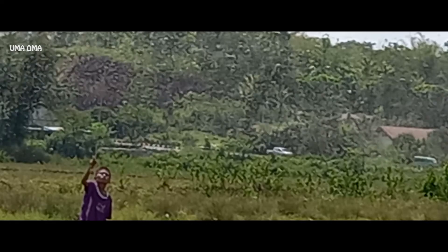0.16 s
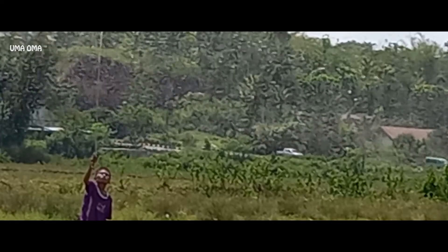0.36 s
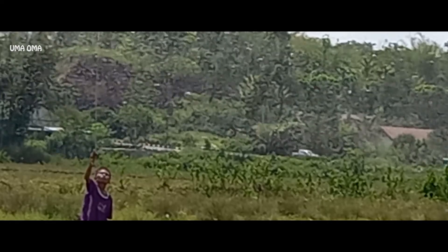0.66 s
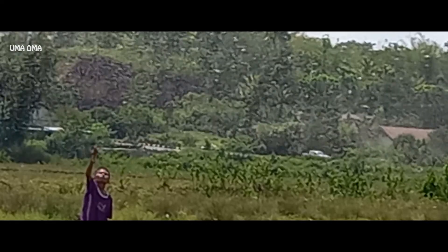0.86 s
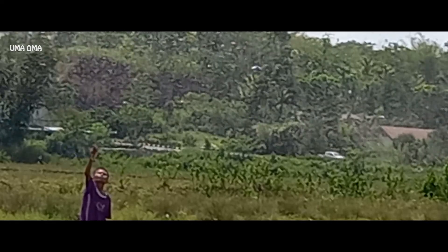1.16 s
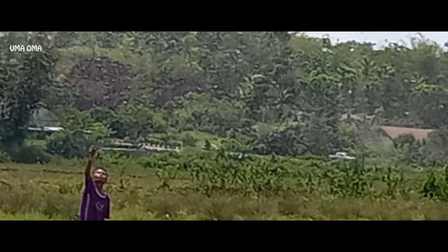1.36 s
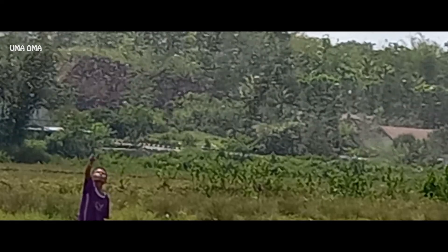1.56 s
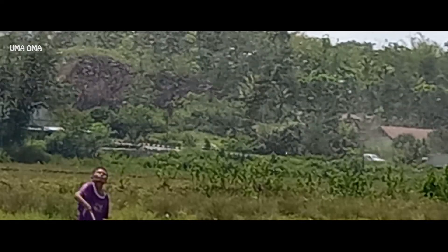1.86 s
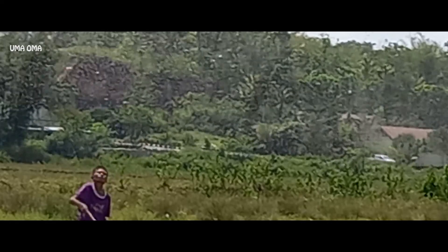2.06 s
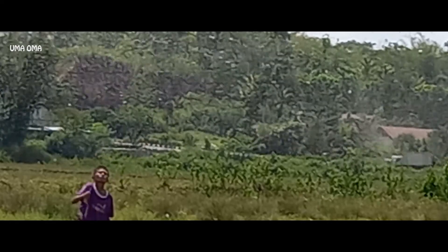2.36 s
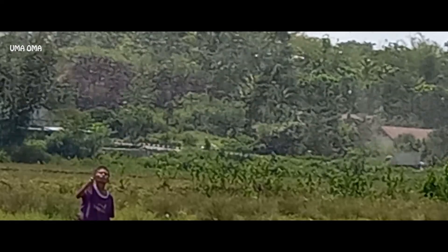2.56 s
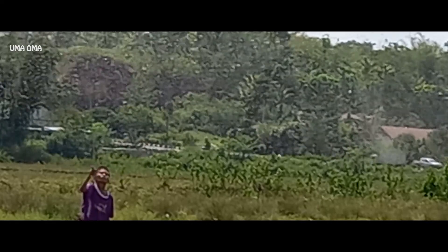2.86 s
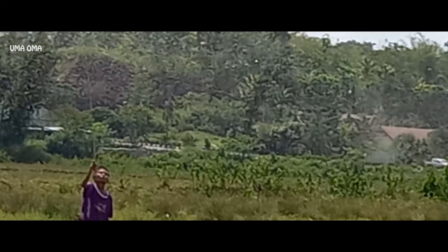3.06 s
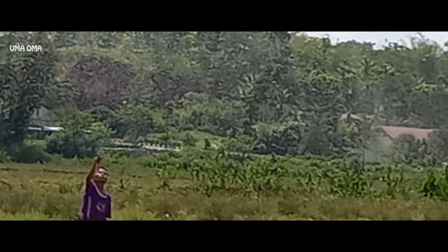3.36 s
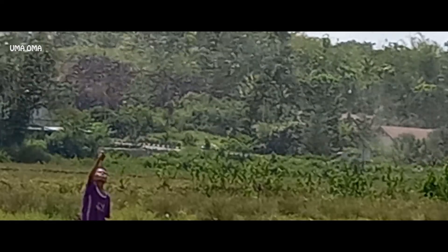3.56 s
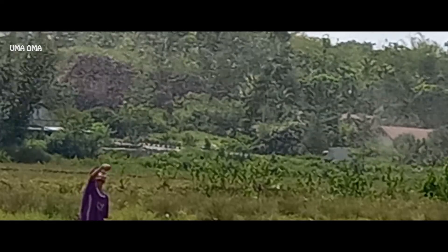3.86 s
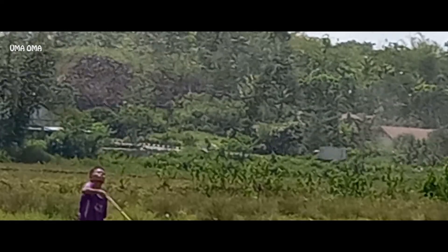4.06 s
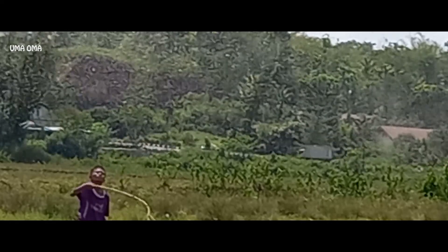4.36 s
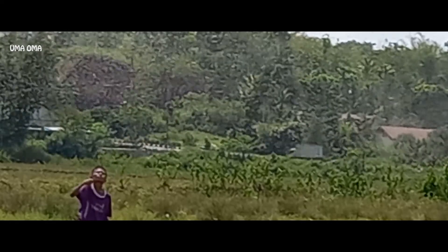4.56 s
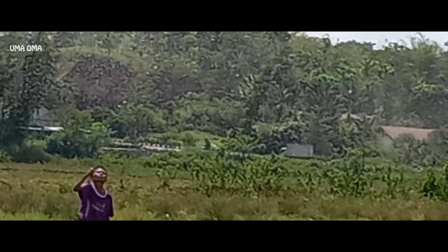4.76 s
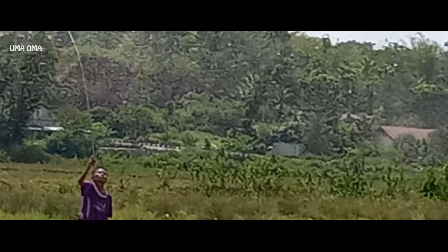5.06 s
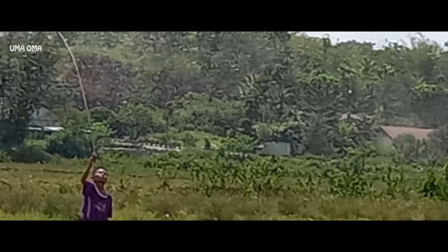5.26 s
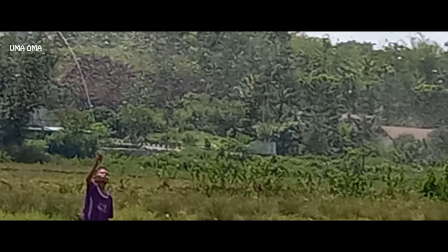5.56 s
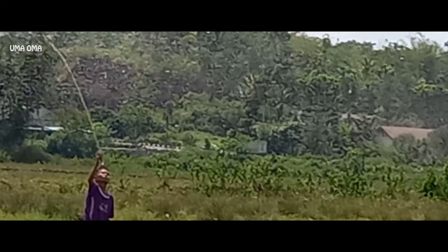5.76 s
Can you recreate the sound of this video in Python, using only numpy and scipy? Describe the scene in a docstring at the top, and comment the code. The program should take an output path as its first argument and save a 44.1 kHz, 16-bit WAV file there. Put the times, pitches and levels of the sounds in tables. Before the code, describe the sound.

A distant single-cylinder engine thuds low throughout in an open field, with a fainter motorbike drone, very faint high insect song and a light wind rumble on the microphone. During the first 1.3 seconds, birds give soft chirps and whistles, leaves stir faintly and a few low wind puffs land. At about 1.3 seconds a horse, somewhat to the right, whinnies once, much louder than everything else. Its high rising squeal breaks at 1.8 seconds into a fast quaver of about eight shakes a second, sinking and growing rougher and hoarser. It ends at 3.5 seconds with a faint hillside echo. Beneath it, the engine speeds up slightly around 2 seconds and settles by 3.5. From 4.8 seconds an insect makes a run of quiet dry ticks that grow stronger, and wind puffs touch the microphone around 5.3 and 5.8 seconds.

```python
"""A far single-cylinder engine thuds and rattles in an open field, with bird calls and microphone wind. Then a
horse whinnies once: a high squeal that breaks into a falling, ever rougher quaver. Its larynx sings two notes
at once (biphonation): a whistle, and a lower buzz that slows to separate slaps in the troughs. The throat's
resonances shape both, and a wooded hillside answers faintly. Insects sing throughout, and a run of dry clicks
ticks near the end."""
import sys
import numpy as np
from scipy import signal
from scipy.fft import rfft, irfft, next_fast_len
from scipy.io import wavfile
from scipy.ndimage import uniform_filter1d, map_coordinates

SR = 44100
rng = np.random.default_rng(int(sys.argv[2]) if len(sys.argv) > 2 else 0)


def to_wav(sig):
    """Store sig (one row per channel, or 1-D mono) as 16-bit WAV at the path in sys.argv[1].

    Samples outside -1..1 are clipped; the rate is SR.
    """
    pcm = np.clip(np.atleast_2d(sig), -1, 1) * 32767
    pcm = np.round(pcm).astype(np.int16)
    wavfile.write(sys.argv[1], SR, pcm.T)  # frames by channels


N = 261072
TIME = np.arange(N) / SR
TOP_HZ = 15750

# Spectra of air, leaves and dry clicks. Each row: frequency in Hz, relative level in dB.
AIR_SPECTRUM = [(290, -10), (500, 1), (537, -9), (667, -0.5), (1100, -7.5), (2140, -19), (5450, -22.5),
                (6290, -31.5), (8510, -23), (15600, -31.5)]
LEAF_SPECTRUM = [(1200, -28), (1700, 3.5), (2300, 5), (3000, -2), (4200, -13.5), (7000, -16), (11000, -24)]
CLICK_SPECTRUM = [(2000, -22.5), (5000, -13.0), (9000, 1.0), (14000, 0.5)]
# Envelopes of the leaves and of the fizz between clicks. Each row: time in seconds, level in dB.
LEAF_LEVEL = [(0, -73), (.3, -67.5), (.7, -71.5), (1.2, -71.5), (3.5, -78.5), (5.92, -78.5)]
FIZZ_LEVEL = [(3.5, -105), (4.8, -92), (5.8, -89)]
# Wind puffs. Each row: centre in seconds, level in dB, half length in seconds, left minus right in dB.
WIND_PUFFS = [(0.347, -50.5, 0.031, 5), (0.612, -46, 0.022, 5), (0.703, -44.5, 0.02, 22.5),
              (5.303, -47, 0.029, -2), (5.845, -41, 0.026, -5)]
# A run of dry clicks. Each row: time in seconds, relative peak in dB.
DRY_CLICKS = [(4.8218, -70.5), (4.8616, -70.5), (5.024, -67.5), (5.0656, -72), (5.1053, -63.5),
              (5.1862, -75.5), (5.2259, -68.5), (5.3437, -65.5), (5.3824, -68), (5.4229, -71),
              (5.5044, -64), (5.545, -69), (5.5856, -74), (5.6265, -61.5), (5.667, -64), (5.7095, -55),
              (5.7497, -56), (5.792, -54), (5.8326, -59.5), (5.874, -53)]
# Bird calls. Each row: start and length in seconds, first, middle and last pitch in Hz,
# waver as a share of the pitch, level in dB.
BIRD_CALLS = [(0.05, 0.14, 8130, 8080, 8300, .004, -73), (0.17, .11, 8300, 7900, 7500, .012, -73),
              (0.11, .21, 2190, 2190, 2260, .02, -71), (0.41, .13, 5900, 7800, 7900, 0.051, -71.5),
              (0.43, .09, 2900, 3150, 2970, .06, -69.5), (0.6, .14, 2260, 2260, 2190, 0.025, -70),
              (0.772, 0.16, 7670, 7850, 8500, .02, -71.5), (0.91, .19, 1112, 1107, 1098, 0.017, -59),
              (1.05, 0.23, 1090, 1042, 1006, .07, -68), (4.253, 0.018, 3100, 3490, 4400, 0.044, -73.5),
              (4.9, .1, 5450, 5546, 5450, .04, -87), (5.36, .1, 5100, 4980, 4860, 0.036, -87)]

# Speeds of the engine's rattle and of its firings. Each row: time in seconds, pulses per second.
RATTLE_SPEED = [(0, 37.5), (.45, 37.45), (1, 37.3), (1.4, 37.4), (4, 38), (5.92, 38)]
ENGINE_SPEED = [(0.0, 18.4), (0.8, 18.06), (1.5, 19.04), (1.9, 21.27), (2.3, 22.97), (2.7, 22.76),
                (3.1, 20.27), (3.6, 18.93), (4.6, 19.3), (5.92, 18.89)]
# Spectra of the engine's rattle, drone, thuds and exhaust. Each row: frequency in Hz, relative level in dB.
RATTLE_SPECTRUM = [(300, -17.5), (450, -17), (700, 2.5), (900, 1), (1150, -23.5), (1600, -52.5)]
DRONE_SPECTRUM = [(110, -24.5), (185, 1.5), (225, 1.5), (290, -10.5), (375, -4), (480, -14.5), (600, -29.5),
                  (900, -49.5)]
THUD_SPECTRUM = [(20, -45.5), (35, -17.5), (55, -4), (85, -1), (120, 6.5), (160, -4.5), (220, -32.5),
                 (320, -40.5), (600, -76)]
EXHAUST_SPECTRUM = [(20, -36), (55, 1.5), (130, 4), (220, -6.5), (310, -11), (450, -28), (800, -46),
                    (1500, -45.5), (3000, -100)]
# The envelopes of the engine's rattle. Each row: time in seconds, rattle in dB, drone in dB.
RATTLE_LEVELS = [(0, -65, -61.5), (.3, -60.5, -68), (.6, -66, -65.5), (1.2, -68.5, -62.5), (2, -79.5, -63),
                 (5.92, -84, -68.5)]
# The engine's envelope. Each row: time in seconds, level in dB.
ENGINE_LEVEL = [(0, -60.5), (.4, -49.5), (.9, -53), (1.9, -46), (2.2, -49), (2.6, -45.5), (3.45, -47),
                (3.75, -50.5), (4.9, -46.5), (5.92, -47.5)]
# The exhaust hardens as the engine is opened up. Each row: time in seconds, dB over the thuds.
EXHAUST_BALANCE = [(0, -4), (1.3, -7), (2, 0.5), (5.92, -1)]

# Shading of a source on the right. Each row: frequency in Hz, left minus right in dB.
SIDE_SHADING = [(1300, 0), (2400, -1.5), (4400, -3.5), (8100, -8), (15000, -1)]
# The hillside's reverberation. Each row: frequency in Hz, seconds to fall by 60 dB.
HILLSIDE_T60 = [(300, 3.6), (2000, 1.1), (4500, 0.98), (8000, 0.54), (15000, 0.2697)]
# Responses of the hillside and of the horse's throat and nose. Each row: frequency in Hz, gain in dB.
HILLSIDE_GAIN = [(1100, -1.5), (1600, -6), (1850, -1), (2020, 4.5), (2250, -2.5), (2800, -2.5),
                 (4100, -1.5), (5000, 1.5), (9000, -3.5)]
VOCAL_TRACT = [(300, -26.5), (700, -26.5), (950, -15.5), (1170, -29.5), (1450, -12), (1900, 2), (2350, -3),
               (2780, 1.5), (3060, -2), (3260, -5), (3370, -16.5), (3520, 2.5), (3700, -14), (3950, -13.5),
               (4250, -7.5), (4700, -18), (4980, -6), (5350, -8), (5750, -15), (6250, -27), (6620, -30.5),
               (6950, -38.5), (7550, -19.5), (7780, -32), (8020, -17), (8300, -28.5), (8850, -27.5),
               (9300, -32.5), (10500, -32), (11600, -28), (12800, -27.5), (14000, -33), (15500, -45)]

# The opening squeal. Each row: time in seconds, pitch in Hz, roughness 0-1, whistle in dB, octave in dB.
SQUEAL = [(1.33, 1550, 0.17, -50.5, -60), (1.365, 1903, 0.04, -43.5, -54.5), (1.39, 2070, 0.05, -39.5, -46),
          (1.408, 2220, 0.05, -48.5, -48), (1.435, 2256, 0.29, -44, -63.5), (1.48, 2264, 0.16, -44, -45),
          (1.51, 2340, 0.11, -36.5, -45.5), (1.59, 2340, .13, -34.5, -40), (1.645, 2335, 0.17, -32, -38.5),
          (1.70, 2287, 0.32, -36, -42), (1.755, 2221, 0.3, -37.5, -42.5)]
# The quaver's arches of pitch. Each row: start in seconds, crest in Hz, depth in Hz, base level in dB,
# roughness added by the break 0-1, share of the shake after which the pressure gives out.
SHAKES = [(1.755, 2381, 102, -34.5, 0.16, 1), (1.861, 2384, 140, -33, 0.08, 0.97),
          (1.981, 2347, 240.3, -33.5, 0.27, 1), (2.103, 2327, 318.4, -31, 0.25, 1),
          (2.222, 2325, 339.8, -30.5, 0.22, 1), (2.345, 2312, 439.2, -30.5, 0.35, 0.89),
          (2.471, 2286, 521, -30, 0.27, 0.9), (2.599, 2258, 601, -30.5, 0.24, 0.81),
          (2.73, 2136, 640, -29.5, 0.17, 0.77), (2.855, 2090, 702, -30.5, .16, .7),
          (2.982, 1982, 560, -29.5, .08, .62), (3.112, 2140, 618.8, -30, 0.13, .76),
          (3.234, 2197, 598, -31.5, 0.18, 0.86), (3.362, 2136, 659.4, -31.5, 0.11, .76)]
# The octave comes forward in the quaver. Each row: time in seconds, dB over the shake's base level.
OCTAVE_BALANCE = [(1.83, -9.5), (1.92, -7.5), (2.08, -7.5), (2.17, -3), (2.55, -2), (2.75, -4),
                  (3.48, -2.5)]
# The voice's treble. Each row: time in seconds, base levels of rasp and sizzle in dB.
TREBLE_LEVELS = [(1.34, -65.5, -79.5), (1.375, -64, -60), (1.405, -62.5, -63.5), (1.49, -56, -45.5),
                 (1.61, -45.5, -41.5), (1.71, -48, -55.5), (1.88, -61, -68), (2.03, -54, -58),
                 (2.15, -50, -68.5), (2.3, -42.5, -52), (2.4, -44, -51), (2.55, -44.5, -57.5),
                 (2.8, -41, -48), (2.98, -46, -54), (3.18, -40.5, -55), (3.33, -42.5, -61),
                 (3.48, -43.5, -57.5)]
# The tiring folds open strongly and weakly by turns. Each row: time in seconds, hoarseness 0-1.
HOARSENESS = [(1.9, 0), (2.25, .35), (2.65, .5), (2.8, .9), (3.48, 1)]
# Squeaks beside the octave. Each row: centre and half length in seconds, pitch in Hz, level in dB.
SQUEAKS = [(1.755, 0.028, 4440, -36), (2.195, .016, 4950, -35.5), (2.312, 0.038, 4960, -33),
           (2.437, 0.015, 4930, -35), (2.556, .014, 4880, -33), (3.298, 0.019, 4870, -37)]
VOICE_END_S = 3.485  # the last shake ends


def amp(db):
    """Amplitude ratio of a level in decibels."""
    return 10 ** (np.asarray(db) / 20)


def unit(x):
    """Normalisation to an overall rms of 1."""
    return x / np.sqrt(np.mean(np.abs(x) ** 2) + 1e-20)


def steady(x, size=900):
    """Normalisation to a running rms of 1, over size samples."""
    return x / np.sqrt(np.abs(uniform_filter1d(np.abs(x) ** 2, size)) + 1e-12)


def along(points, hz):
    """Interpolation of (Hz, value) points on a logarithmic axis."""
    f, v = np.transpose(points)
    return np.interp(np.log(hz + 1), np.log(f + 1), v)


def curves(rows):
    """Linear interpolation, per sample, of each column after the time."""
    s, *columns = np.transpose(rows)
    return [np.interp(TIME, s, c) for c in columns]


def wobble(rate):
    """Smooth random modulation with rate knots a second."""
    return map_coordinates(rng.standard_normal(int(N * rate / SR) + 4), [TIME * rate])


def bell(centre_s, half_s):
    """A Gaussian envelope."""
    return np.exp(-((TIME - centre_s) / half_s) ** 2 / 2)


def pulses(cycles):
    """An impulse train: one pulse per completed cycle."""
    return np.diff(np.floor(cycles), prepend=0)


def noise(side):
    """Partly coherent stereo white noise; side weights the part that differs between the ears."""
    a, b = rng.standard_normal((2, N))
    return unit(np.array([a + side * b, a - side * b]))


def band(hz, low_hz, high_hz, order=16):
    """Gain of a steep band-pass filter."""
    return 1 / (1 + (low_hz / (hz + 1)) ** order) / (1 + (hz / high_hz) ** order)


def filtered(x, response):
    """Linear filtering: the spectrum of x times a complex response."""
    m = next_fast_len(N + SR // 2)
    return irfft(rfft(x, m) * response(np.fft.rfftfreq(m, 1 / SR)), m)[..., :N]


def coloured(x, spectrum):
    """Spectral shaping by (Hz, dB) points, at rms 1."""
    return unit(filtered(x, lambda hz: amp(along(spectrum, hz))))


def struck(x, spectrum):
    """Minimum-phase ringing through a (Hz, dB) spectrum: nothing sounds ahead of a pulse."""
    size = 4096
    cepstrum = irfft(np.log(amp(along(spectrum, np.fft.rfftfreq(size, 1 / SR)))))
    ring = irfft(np.exp(rfft(cepstrum * 2 * (np.arange(size) < size // 2))))
    return signal.fftconvolve(x, ring)[:N]


def reverberate(x, tail):
    """Convolution with a stereo impulse response, normalised in energy."""
    return signal.fftconvolve(x[None], tail / np.linalg.norm(tail[0]), axes=1)[:, :N]


def field():
    """Ambient noise: broadband air and stirring leaves, and a narrow band of insect song."""
    air = amp(-73) * coloured(noise(side=1), AIR_SPECTRUM)
    leaf_db = curves(LEAF_LEVEL)[0] + .9 * wobble(17)
    leaves = amp(leaf_db) * coloured(noise(side=.93), LEAF_SPECTRUM)
    insects = unit(filtered(noise(side=.46), lambda hz: band(hz, 8060, 8520, order=50)))
    return air + leaves + amp(-83.5 + wobble(6.7)) * insects * amp([[-5], [3]])


def wind():
    """Turbulent pressure on the microphone: short low puffs over a weak buffeting."""
    puffs = sum(amp([[db + pan_db / 2], [db - pan_db / 2]]) * bell(s, half_s)
                for s, db, half_s, pan_db in WIND_PUFFS)
    eddies = filtered(noise(side=.33), lambda hz: band(hz, 50, 98, order=8))
    return steady(eddies, size=3000) * (puffs + amp(-54.5 + 2.7 * wobble(6.9)))


def dry_ticks(width_s=.0025, gain_db=-10.5):
    """Broadband transients: a run of dry clicks, with a faint fizz between them."""
    clicks = sum(amp(db + gain_db) * np.exp(-np.abs(TIME - s) / width_s) for s, db in DRY_CLICKS)
    return (clicks + amp(curves(FIZZ_LEVEL)[0])) * coloured(noise(side=.55), CLICK_SPECTRUM)


def birds():
    """Frequency modulation: each call is a gliding whistle, made buzzy by a fast waver."""
    song, waver = np.zeros(N), wobble(700)
    for s, length, start_hz, middle_hz, end_hz, unsteady, db in BIRD_CALLS:
        call = (TIME >= s) & (TIME < s + length)
        progress = (TIME[call] - s) / length
        hz = np.interp(progress, [0, .5, 1], [start_hz, middle_hz, end_hz])
        hz *= 1 + unsteady * waver[call]
        song[call] += amp(db) * np.sin(np.pi * progress) * np.sin(2 * np.pi * np.cumsum(hz) / SR)
    return song


def engine_rattle(pop_s=.024, pop_scatter=.35):
    """Repetition makes pitch: nearly identical pops, smeared by distance, merge into a drone."""
    firing_hz = curves(RATTLE_SPEED)[0] * (1 + .002 * wobble(5))
    cycle = np.cumsum(firing_hz) / SR
    decay = np.exp(-(cycle % 1) / firing_hz / pop_s)
    smear = rng.standard_normal(SR // 20) * np.exp(-np.arange(SR // 20) / SR / pop_s)
    pops = unit(signal.fftconvolve(pulses(cycle), smear)[:N])
    putter = pops + pop_scatter * unit(noise(side=.84) * decay)
    rattle_db, drone_db = curves(RATTLE_LEVELS)
    return amp(rattle_db) * coloured(putter, RATTLE_SPECTRUM) + amp(drone_db) * coloured(putter, DRONE_SPECTRUM)


def engine(scatter_db=.34):
    """Periodic excitation: each firing gives one low thud and one puff of exhaust noise."""
    cycle = np.cumsum(curves(ENGINE_SPEED)[0]) / SR
    firings = pulses(cycle) * amp(scatter_db * wobble(8.2))
    thuds = -coloured(firings, THUD_SPECTRUM)
    puffing = np.exp(.25 * np.cos(2 * np.pi * cycle))
    exhaust = amp(curves(EXHAUST_BALANCE)[0]) * coloured(noise(side=.42) * puffing, EXHAUST_SPECTRUM)
    return amp(curves(ENGINE_LEVEL)[0]) * unit(thuds + exhaust) * amp([[-1], [1]])


def hillside(x, build_s=.18):
    """Diffuse reflection: farther trees answer later, so the echo builds, then fades, treble first."""
    hz, t, spectra = signal.stft(rng.standard_normal((2, 3 * SR // 2)), SR, nperseg=256)
    build = 1 - np.exp(-t / build_s)
    decay = amp(-60 * t / along(HILLSIDE_T60, hz)[:, None])
    tail = signal.istft(spectra * build * decay, SR, nperseg=256)[1]
    return reverberate(filtered(x, lambda hz: amp(along(HILLSIDE_GAIN, hz))), tail)


def crops(x, t60_s=.055):
    """Scattering by crops near the horse: a short tail, nearly alike at both ears."""
    t = np.arange(SR // 10) / SR
    return reverberate(x, noise(side=.5)[:, :len(t)] * amp(-60 * t / t60_s))


def from_right(x, lag_ms=.4364):
    """Interaural time and level differences: the left side hears the sound later and shaded."""
    def ears(hz):
        left = amp(along(SIDE_SHADING, hz) / 2) * np.exp(-1j * np.pi * hz * lag_ms / 1000)
        pair = np.array([left, 1 / left])
        return pair / np.sqrt(np.mean(np.abs(pair) ** 2, axis=0))
    return filtered(x, ears)


def quaver(crest_at=.48, break_at=.58, swell_db=3.5, spent_db=4, clean_hz=2620, choke_hz=530):
    """Modulation of pitch and pressure: each shake swells, then breaks, sags and chokes."""
    start, *columns, gives_out = np.transpose(SHAKES)
    edges = np.append(start, VOICE_END_S)
    middles = (edges[:-1] + edges[1:]) / 2
    crest_hz, depth_hz, db, break_rough = [np.interp(TIME, middles, c) for c in columns]
    progress = np.interp(TIME, edges, np.arange(len(edges))) % 1
    # round crests, pointed troughs
    sag_hz = depth_hz * np.interp(progress, [0, crest_at, 1], [1, 0, 1]) ** 1.8
    broken = uniform_filter1d((progress > break_at) * 1.0, size=400)
    coming_sag_hz = np.interp(TIME + .006, TIME, sag_hz)  # roughness leads the trough
    rough = (clean_hz - crest_hz) / 1400 + break_rough * broken + coming_sag_hz / 780
    choke = (sag_hz / choke_hz) ** 2
    spent = sum((TIME > a + share * (b - a)) & (TIME < b)
                for a, b, share in zip(start, edges[1:], gives_out))
    pressure_db = uniform_filter1d(swell_db * (progress - .5) - spent_db * spent, size=400)
    # the voice catches for an instant between deep shakes
    catch = depth_hz / choke_hz * sum(np.exp(-((TIME - s) / .012) ** 2) for s in start[1:])
    whistle_db = db + pressure_db - 1.5 * choke - 1.5 * catch
    octave_db = db + curves(OCTAVE_BALANCE)[0] + pressure_db / 2 - 8.5 * choke
    return crest_hz - sag_hz, rough, whistle_db, octave_db


def larynx(pitch, rough, hoarse):
    """Biphonation: the slower vocal folds chop the flow and tug the whistle's phase, adding sidebands."""
    waver = .005 * wobble(45) + (.01 + .02 * rough ** 2) * wobble(700)
    phase = 2 * np.pi * np.cumsum(pitch * (1 + waver)) / SR
    fold_hz = 490 * (pitch / 2310) ** (1.15 - .3 * hoarse)
    jitter = (.11 - .03 * rough) * (1 - .55 * hoarse) * wobble(450)
    fold_phase = 2 * np.pi * np.cumsum(fold_hz * (1 + jitter)) / SR
    # strong and weak openings alternate; when rough they also scatter
    limp = hoarse * (1 - rough) * (.46 * np.exp(.5j * fold_phase) + .3 * np.exp(1.5j * fold_phase))
    creak = rough * (.4 * np.cos(fold_phase / 2) + .22 * wobble(350))
    opening = np.exp(rough ** .8 * np.cos(fold_phase) + creak + limp.real)
    tug = 1.35 * rough ** 1.1 * np.sin(fold_phase) + 1.05 * rough ** 2 * np.sin(fold_phase / 2)
    flow = steady(np.tanh(opening / 2))  # the folds can only open so far
    return phase, tug + limp.imag, fold_phase, flow


def flutter(pitch, flow, below_hz=2100, span_hz=600, range_db=10):
    """Flow-modulated noise: the throat flutters more as the pitch sinks."""
    slack = np.minimum((below_hz - pitch) / span_hz, 1)
    breath = filtered(flow * rng.standard_normal(N), lambda hz: band(hz, 523, 1030, order=10))
    return amp(-54 + range_db * (slack - 1)) * unit(breath)


def slaps(pitch, fold_phase, below_hz=2150, span_hz=350, scatter_db=1.1):
    """Period doubling: at low pitch the slack folds slap shut every second cycle and ring the throat."""
    closings = pulses(fold_phase / (4 * np.pi)) * amp(scatter_db * wobble(200))
    slack = np.clip((below_hz - pitch) / span_hz, 0, 1)
    return amp(-40) * slack * steady(struck(closings, VOCAL_TRACT), size=4000)


def squeaks(flow, jitter=.016):
    """Amplitude modulation: the folds chop brief, unsteady whistles that split off as the voice breaks."""
    phase_per_hz = 2 * np.pi * np.cumsum(1 + jitter * wobble(500)) / SR
    return sum(amp(db) * bell(s, half_s) * unit(flow * np.sin(hz * phase_per_hz))
               for s, half_s, hz, db in SQUEAKS)


def horse(attack_s=.02, blend_s=.046, release_db_per_s=557, crest_db_per_khz=8, crumble=.55):
    """Source and filter: whistle harmonics and turbulence, chopped by the folds, shaped by the throat."""
    shaking = np.clip((TIME - SHAKES[0][0]) / blend_s, 0, 1)
    controls = (1 - shaking) * np.array(curves(SQUEAL)) + shaking * np.array(quaver())
    pitch, rough, whistle_db, octave_db = controls
    rough = np.clip(rough, 0, 1)
    hoarse, = curves(HOARSENESS)
    phase, tug, fold_phase, flow = larynx(pitch, rough, hoarse)
    # in the deepest troughs the whistle gives way to turbulence
    whistle = flow * (1 - rough * np.interp(pitch, [1650, 2000], [.6, 0]))
    hiss = flow * (.16 + .55 * rough + .06 * rough ** 4)

    def register(orders, hiss_db, low_hz, high_hz, tone_top_hz=TOP_HZ):
        """Resonance of one band of the throat, driven by some harmonics and their turbulence."""
        clear = (1 - crumble * rough ** 2) ** orders[0]  # higher harmonics crumble sooner
        harmonics = sum(np.cos(k * phase + k ** .25 * tug) for k in orders)
        tone = filtered(clear * whistle * harmonics, lambda hz: band(hz, low_hz, tone_top_hz, order=60))
        source = tone + amp(hiss_db) * hiss * rng.standard_normal(N)
        shaped = filtered(source, lambda hz: amp(along(VOCAL_TRACT, hz)) * band(hz, low_hz, high_hz))
        return steady(shaped, size=400)

    fundamental = register([1], hiss_db=5.5, low_hz=300, high_hz=3300)
    octave = register([2], hiss_db=4, low_hz=3450, high_hz=5900, tone_top_hz=5050)
    rasp = register([3, 4], hiss_db=19, low_hz=5950, high_hz=10400)
    sizzle = register([5, 6], hiss_db=15, low_hz=10800, high_hz=15800)
    rasp_db, sizzle_db = curves(TREBLE_LEVELS)
    crest_khz = shaking * (pitch - uniform_filter1d(pitch, size=5600)) / 1000
    brightening = amp(crest_db_per_khz * crest_khz)
    treble = brightening * (amp(rasp_db) * rasp + amp(sizzle_db + 1.5 * wobble(20)) * sizzle)
    troughs = shaking * (hoarse * flutter(pitch, flow) + slaps(pitch, fold_phase))
    voice = amp(whistle_db) * fundamental + amp(octave_db) * octave + treble + troughs + squeaks(flow)
    shudder_db = 1.5 * rough * wobble(110)
    attack = np.clip((TIME - SQUEAL[0][0]) / attack_s, 0, 1)
    release_db = release_db_per_s * np.maximum(TIME - VOICE_END_S, 0)
    return voice * attack * amp(shudder_db - release_db)


def scene():
    """Superposition: horse and engine to the right, birds, echoes of the calls, and the field around."""
    whinny, song = horse(), birds()
    direct = from_right(whinny + amp(-12.5) * crops(whinny) + engine() + engine_rattle()) + song
    echoes = amp(-27.5) * hillside(whinny) + amp(-19) * hillside(song)
    return direct + echoes + wind() + field() + dry_ticks()


def record(dry):
    """Band limiting: nothing above TOP_HZ passes."""
    return filtered(dry, lambda hz: hz < TOP_HZ)


dry = scene()
out = record(dry)
to_wav(out)
```